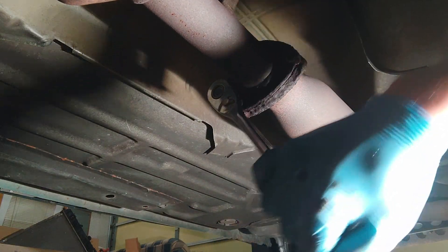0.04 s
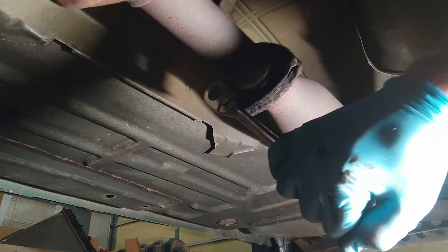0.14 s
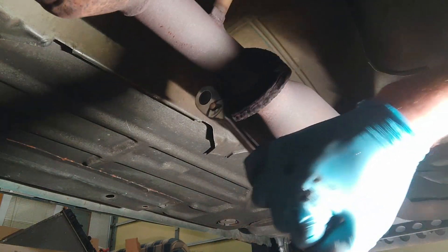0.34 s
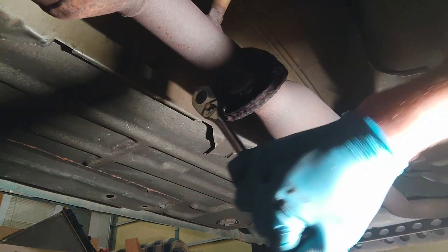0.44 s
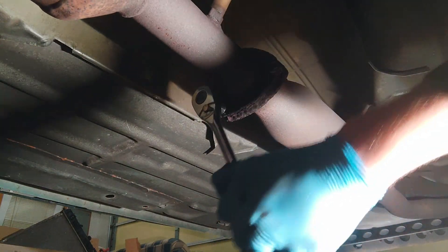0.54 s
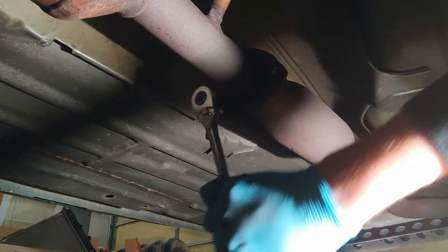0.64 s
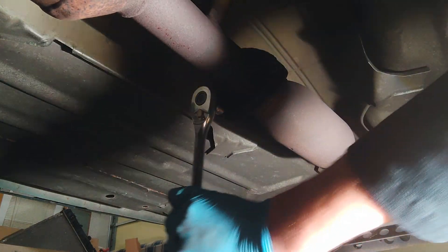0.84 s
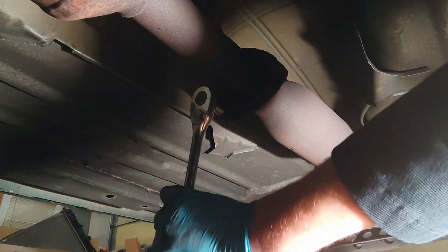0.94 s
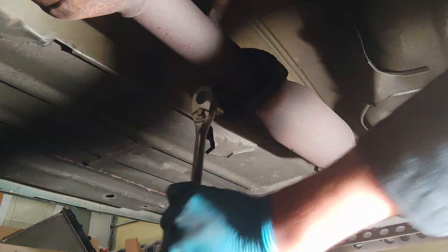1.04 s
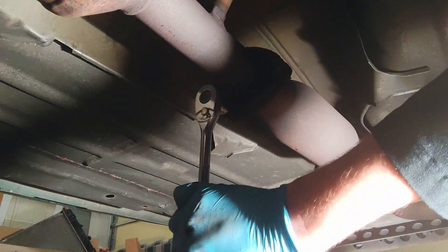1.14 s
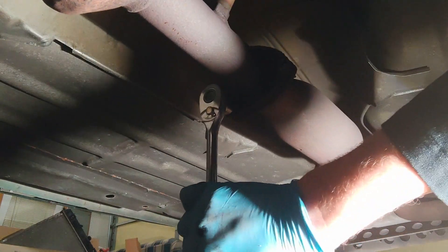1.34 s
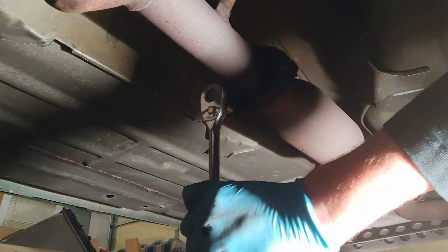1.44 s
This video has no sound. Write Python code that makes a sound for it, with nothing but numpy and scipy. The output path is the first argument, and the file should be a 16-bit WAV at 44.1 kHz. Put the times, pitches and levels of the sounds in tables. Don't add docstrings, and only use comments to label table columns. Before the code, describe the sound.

Ratchet wrench clicks quickly on its back-swing between two short rasping pulls on a rusty bolt

```python
import sys
import numpy as np
from scipy import signal
from scipy.io import wavfile
from scipy.ndimage import uniform_filter1d

SR = 44100
rng = np.random.default_rng(int(sys.argv[2]) if len(sys.argv) > 2 else 0)


def ratio(d):
    e = np.asarray(d, float) / 20
    return 10 ** e


def store_wav(level_fs):
    pcm = np.round(np.clip(np.atleast_2d(level_fs), -1, 1) * 32767)
    wavfile.write(sys.argv[1], SR, pcm.T.astype(np.int16))


N = 66150

TOP_BAND_HZ = 14400
WIDE_HZ = 600


def evened(x):
    return x / np.sqrt(np.mean(x ** 2) + 1e-20)


def read(points, hz):
    f, value = np.transpose(points)
    return np.interp(np.log(hz + 1), np.log(f + 1), value)


def add(mix, start_s, sound):
    part = mix[round(start_s * SR):][:len(sound)]
    part += sound[:len(part)]


def colour(x, points, scale=1):
    db = np.maximum(scale * read(points, abs(np.fft.fftfreq(4096, 1 / SR))), -100)
    log = db * np.log(10) / 20
    taps = np.fft.ifft(np.exp(log - 1j * signal.hilbert(log).imag)).real[:2048]
    return signal.fftconvolve(x, taps)[:len(x)]


def band(x, lo_hz, hi_hz):
    return signal.sosfilt(signal.butter(2, [lo_hz, hi_hz], "band", fs=SR, output="sos"), x)


def ring(x, modes):
    t = np.arange(SR // 3) / SR
    body = sum(ratio(db - 60 * t / t60) * np.sin(2 * np.pi * hz * t) for hz, db, t60 in modes)
    return signal.fftconvolve(x, body / np.linalg.norm(body))[:len(x)]


def clicks(size, per_s, spread_db):
    chance = rng.random(size)
    extra = rng.exponential(1, size)
    sign = rng.choice([-1., 1.], size)
    return evened((chance < per_s / SR) * sign * ratio(spread_db * np.minimum(extra, 4)))


def air():
    # pitch in Hz, likeness from 0 to 1.
    likeness = [(30, 0.91), (200, 0.78), (700, 0.26), (2000, 0.071), (10000, 0.1)]
    # pitch in Hz, level in dB per Hz.
    air_tone = [(15, 21.5), (35, -21), (85, -3), (160, 5), (350, -16.5), (1000, -16), (4000, -20.5),
                (15000, -29)]
    hum_hz, hum_width_hz, hum_db, air_db = 92.4, 31.4, -54.5, -49.5

    frames, hz = N // 256 + 5, np.fft.rfftfreq(1024, 1 / SR)
    a, b, c, d, patches = rng.standard_normal((frames, 513, 5)).T
    patches = evened(uniform_filter1d(uniform_filter1d(patches, 12, 0), 14, 1))
    same = np.clip(read(likeness, hz), -1, 1)[:, None]
    left = a + 1j * b
    right = same * left + np.sqrt(1 - same ** 2) * (c + 1j * d)
    spectrum = np.array([left, right]) * ratio(read(air_tone, hz)[:, None] + 2.1 * patches)
    wash = signal.istft(spectrum, nperseg=1024, noverlap=768)[1][:, :N]
    hum = band(rng.standard_normal(N), hum_hz - hum_width_hz / 2, hum_hz + hum_width_hz / 2)
    return ratio(air_db) * evened(wash) + ratio(hum_db) * evened(hum)


def bumps():
    # centre in seconds, level in dB, length in seconds, shake in Hz, push (1) or pull (-1).
    pushes = [(.3022, -27.5, .015, 230, 1), (.316, -30, .018, 20, 1), (.3235, -29, .007, 20, -1),
              (.3345, -29, .011, 20, -1), (.352, -36, .03, 50, 1), (.372, -37, .018, 90, -1),
              (.412, -38, .03, 40, 1), (.422, -30, .008, 150, 1), (.4325, -31, .013, 330, -1),
              (.44, -31, .012, 30, -1), (.4515, -33, .009, 260, 1), (.48, -38, .03, 60, -1),
              (1.11, -43, .06, 80, 1), (1.135, -44, .03, 350, -1), (1.2, -43, .05, 95, 1),
              (.24, -42, .05, 95, 1)]
    out = np.zeros(N)
    for centre_s, db, length_s, hz, sign in pushes:
        t = np.arange(-length_s / 2, length_s / 2, 1 / SR)
        swing = np.cos(np.pi * t / length_s) ** 2
        add(out, centre_s - length_s / 2, sign * ratio(db) * swing * np.cos(2 * np.pi * hz * t))
    return out


def ticks():
    # time in seconds, peak in dB, pitch in Hz, hiss against the note in dB.
    grit = [(0.03, -63, 4960, 6.5), (.197, -50, 2870, -10), (.236, -41.5, 3130, -3.5),
            (0.3312, -48, 7560, 3), (0.365, -66, 11200, 9), (0.4033, -50, 4070, 10), (.4655, -41, 730, -9),
            (0.487, -62, 12100, 12.5), (.526, -59, 3500, 0), (0.558, -58, 11700, 0), (1.11, -49, 2700, -6),
            (1.11, -49, 1800, -20), (1.139, -48, 3100, -8), (1.14, -50, 930, -15), (1.376, -48, 1660, -12),
            (1.375, -57, 2750, -12), (1.3748, -56, 3350, -8), (1.376, -57, 4400, -10),
            (1.377, -58, 5700, -10), (1.376, -59, 9500, -10)]
    fade_s, louder_db = 0.059, 1
    out, t = np.zeros(N), np.arange(SR // 8) / SR
    for s, db, hz, hiss_db in grit:
        a, b = rng.standard_normal((2, len(t)))
        note = evened(band(a, hz * .93, hz * 1.08))
        hiss = ratio(hiss_db) * evened(band(b, 1500, 16000))
        fade = np.minimum(t / .0015, 1) * ratio(db + louder_db - 60 * t / fade_s)
        add(out, s - .001, fade * (note + hiss))
    return out


def rasp():
    # time in seconds, effort in dB, brightness in dB, bolt share in dB.
    pull = [(0, -49, -3, -5), (.06, -68.5, -5, -6.5), (0.157, -68, 18, -5), (0.195, -52.5, 9.5, 0.5),
            (0.244, -41, 1, -12.5), (.28, -45, -2, -12), (.36, -54, 1.5, -13.5), (0.443, -64, 19.5, 2),
            (.5, -57, 5, -13.5), (0.638, -55, 8, -14), (.7, -68, 26.5, -19.5), (0.999, -67, 28.5, -12.5),
            (1.07, -61.5, 0, -27), (1.111, -56, 16.5, -8.5), (1.144, -43.5, 2, -20), (1.199, -56.5, 2, -13),
            (1.3, -60.5, -3, -14.5), (1.5, -83.5, 1, 9)]
    # pitch in Hz, width in Hz, level in dB.
    bolt_notes = [(404, 30, 0), (440, 40, -5), (560, 40, -10), (685, 22, -7)]
    # pitch in Hz, width in Hz, level in dB.
    flange_notes = [(525, 70, -1), (700, 30, -7), (800, 30, -3), (895, 55, -1), (1150, 120, -6),
                    (1830, 120, -12), (2830, 160, -10)]
    # pitch in Hz, level in dB per Hz.
    rust_tone = [(60, -11), (110, 1), (220, -8), (450, -11), (1200, -12), (2800, -14.5), (12000, -24.5),
                 (16000, -31.5)]
    base_bolt_db, base_flange_db, grind_db = 6, -11, -5

    t = np.arange(N) / SR
    s, effort_db, bright_db, bolt_db = np.transpose(pull)
    bolt_db = np.interp(t, s, bolt_db)
    slips = clicks(N, per_s=1500, spread_db=3)
    bolt = evened(ring(slips, [(hz, db, 2.2 / width) for hz, width, db in bolt_notes]))
    flange = evened(ring(slips, [(hz, db, 2.2 / width) for hz, width, db in flange_notes]))
    grind = evened(colour(slips + .8 * rng.standard_normal(N), rust_tone))

    both = ratio(base_bolt_db + bolt_db) * bolt + ratio(base_flange_db - bolt_db / 2) * flange
    both = both + ratio(grind_db) * grind
    low = band(both, 60, 1200)
    high = ratio(np.interp(t, s, bright_db)) * band(both, 1200, 17000)
    return ratio(np.interp(t, s, effort_db)) * (low - high)


def rattle(stretch):
    rise_s, fade_s, bounce_s, bounce_db = .0025, .034, .009, -9
    t = np.arange(SR // 3) / SR

    def landing(u):
        rise = np.clip(u / rise_s / stretch ** 1.6, 0, 1)
        return rise * ratio(-60 * np.maximum(u, 0) / fade_s / stretch)

    chatter = clicks(len(t), per_s=7000, spread_db=2.5)
    bounce = ratio(bounce_db) * landing(t - bounce_s * rng.uniform(.8, 1.2))
    return chatter * (landing(t) + bounce) / stretch ** .5


def tooth(peak_db, pipe_db, head_db, sizzle_db, low_hz, high_hz, note_db, shaft_db, stretch):
    # pitch in Hz, level in dB, time to fade by 60 dB in seconds.
    pipe_modes = [(697, -5, .1), (790, 0, .12), (900, -1, .13), (1580, -2, .07), (1760, 0, .09)]
    # pitch in Hz, level in dB, fade time in seconds.
    handle_modes = [(2330, -8, .08), (2620, -6, .05), (2978, -5, .18), (3155, -8, .08), (3405, -4, .12),
                    (3450, -1, .08), (3545, -4, .06), (3838, -6, .1), (4070, -5, .08), (4350, -5, .05),
                    (4600, -9, .05), (4920, -9, .1), (5185, -6, .09)]
    # pitch in Hz, level in dB, fade time in seconds.
    head_modes = [(5800, -3, .04), (6330, -2, .035), (6900, -4, .03), (7400, -4, .04), (7890, -3, .03),
                  (8110, 1, .04), (8256, -2, .07), (8330, -4, .05), (8400, -3, .05), (8810, -3, .035)]
    # pitch in Hz, level in dB, fade time in seconds.
    shaft_modes = [(2978, -7, .3), (3408, -9, .18), (4858, 0, .26), (4895, -9, .2), (8256, -12, .12)]
    # pitch in Hz, level in dB per Hz.
    crack_tone = [(400, -14), (900, 14), (1400, -33.5), (2300, 5.5), (3400, 4), (8200, 1), (13800, -0.5),
                  (16000, -34)]
    grip_db, favour_db = 3, 3
    note_fade_s, louder_db = .011, 1.5

    t = np.arange(SR // 3) / SR
    drive = rattle(stretch)
    crack = colour(drive, crack_tone)
    crack = crack * np.linalg.norm(drive) / np.linalg.norm(crack)
    out = ratio(note_db) * ring(drive, [(low_hz, 0, note_fade_s), (high_hz, 0, note_fade_s)])
    out = out + ratio(sizzle_db) * band(crack, 9000, 17000)

    # modes, level dB, lowest Hz, highest Hz, sign of the crack, ring against the crack dB
    bodies = [(pipe_modes, pipe_db, 550, 2000, 1, -5.5),
              (handle_modes, 0, 2000, 5500, 1, -7.5),
              (head_modes, head_db, 5500, 9000, -1, -7.5)]
    for modes, body_db, lo, hi, sign, ring_db in bodies:
        held = []
        for hz, db, t60 in modes:
            favour = favour_db * (abs(hz - low_hz) < 30)
            held.append((hz, db + grip_db * rng.standard_normal() + favour, t60))
        out = out + ratio(body_db) * (sign * band(crack, lo, hi) + ratio(ring_db) * ring(drive, held))

    shaft = sum(ratio(db - 60 * t / t60) * np.sin(2 * np.pi * (hz * t + rng.random()))
                for hz, db, t60 in shaft_modes)
    return ratio(peak_db + louder_db) * (out + ratio(shaft_db) * np.minimum(t / .005, 1) * shaft)


def tool():
    # start in seconds, peak in dB, then shares of pipe, head and sizzle in dB.
    drops = [
        (.666, -26, -1, 3.5, 3),
        (0.7135, -29.5, 1, 8.5, 3),
        (.7508, -23, -10, -7.5, 6),
        (0.805, -26.5, -16, 6, 5.5),
        (.847, -21.5, -17, 1, 2.5),
        (0.8874, -22, -47, 2.5, 3),
        (.930, -23, -23, 6.5, 4),
        (.976, -24, -6, 2, 5),
        (1.017, -32, -17, -24, -15),
        (0.787, -42.5, -17, 17, -2),
    ]
    # low note in Hz, high note in Hz, notes in dB, shaft ring in dB,
    # stretch of the rattle in times.
    seats = [(6250, 12500, 0, -32, .9), (3500, 11000, -3, -30, 1.1), (4200, 9800, -3, -24, 1.0),
             (3500, 6400, -2, -28, 1.2), (4300, 8000, -3, -25, 1.5), (3450, 8250, -1, -27, 1.5),
             (3420, 8150, 2, -27, 1.1), (4860, 8250, -4, -18, 1.1), (4860, 3000, -8, -22, 1.8),
             (9300, 5000, -8, -30, 1.0)]
    out = rasp() + ticks()
    for (start_s, *drop), seat in zip(drops, seats):
        add(out, start_s, tooth(*drop, *seat))
    return out


def space(near, apart):
    # pitch in Hz, time to fade by 60 dB in seconds.
    garage_fade = [(300, 0.18), (1500, 0.19), (4000, 0.31), (12000, 0.22)]
    # pitch in Hz, left minus right in dB.
    side_lean = [(500, 0), (950, -1), (2400, -5), (4500, 0), (8000, -3), (12000, .6)]
    room_db, apart_db, right_lag = -4.5, -4, 19

    t = np.arange(SR * 2 // 3) / SR
    noise = rng.standard_normal((2, len(t))) * np.minimum(t / 0.0074, 1)
    hz, s, z = signal.stft(noise, SR, nperseg=256)
    tail = signal.istft(z * ratio(-60 * s / read(garage_fade, hz)[:, None]), SR, nperseg=256)[1]
    tail = ratio(room_db) * tail / np.linalg.norm(tail[0])
    mid = tail.mean(0)
    side = band((tail[0] - tail[1]) / 2, WIDE_HZ, 13000)
    wet = signal.fftconvolve(near[None], np.array([mid + side, mid - side]), axes=1)[:, :N]

    apart = ratio(apart_db) * band(apart, WIDE_HZ, 17000)
    left = near + apart + wet[0]
    right = np.roll(near - apart, right_lag) + wet[1]
    return np.array([colour(left, side_lean, .5), colour(right, side_lean, -.5)])


def scene():
    duck_from_db, duck_share = -36, 0.45
    work = space(tool(), tool())
    power_db = 10 * np.log10(abs(uniform_filter1d((work ** 2).mean(0), size=6000)) + 1e-12)
    return work + bumps() + air() * ratio(-duck_share * np.maximum(power_db - duck_from_db, 0))


def starve(x):
    busy_db, hole_share, hole_from_hz = -40, .13, 2000
    thin_hz, thin_db, whim_db = 13200, -5, 2.5

    hz, s, z = signal.stft(x, SR, nperseg=256, noverlap=192)
    power = (abs(z) ** 2).mean(0)
    blocks = np.arange(len(s)) // 8 * 8 + 4
    rows = np.arange(len(hz)) // 3 * 3 + 1
    cells = uniform_filter1d(uniform_filter1d(power, size=3, axis=0), size=8, axis=1)
    cells = cells[np.minimum(rows, len(hz) - 1)][:, np.minimum(blocks, len(s) - 1)]

    recent = signal.lfilter(np.ones(30) / 30, 1, power[hz > hole_from_hz].sum(0))
    recent = recent[np.minimum(blocks - 4, len(s) - 1)]
    in_range = (hz > hole_from_hz) & (hz < TOP_BAND_HZ)
    busy = (recent > ratio(2 * busy_db)) & in_range[:, None]

    usual = uniform_filter1d(power.mean(1), size=15) + 1e-20
    whim = rng.standard_normal((len(hz) + 2, len(s) + 8))[rows][:, blocks]
    chance = ratio(2 * thin_db * (hz > thin_hz)[:, None] + 2 * whim_db * whim)
    under = cells / (recent + 1e-20) / usual[:, None] * chance
    holes = busy & (under < np.quantile(under[busy], hole_share))
    return signal.istft(z * ~holes, SR, nperseg=256, noverlap=192)[1][:, :N]


def below(x, hz):
    taps = signal.firwin(401, hz, window=("kaiser", 8), fs=SR)
    return signal.oaconvolve(x, taps[None], "same")


def band_limit(x):
    return signal.sosfilt(signal.butter(12, 16270, fs=SR, output="sos"), x)


def record(dry):
    gate_db = -53
    low = below(dry, TOP_BAND_HZ)
    top = below(dry, 16300) - low
    loud = np.sqrt(abs(uniform_filter1d((top ** 2).mean(0), size=128))) > ratio(gate_db)
    gate = uniform_filter1d(loud * 1., size=128)
    return band_limit(starve(low + top * gate))


dry = scene()
out = record(dry)
store_wav(out)
```